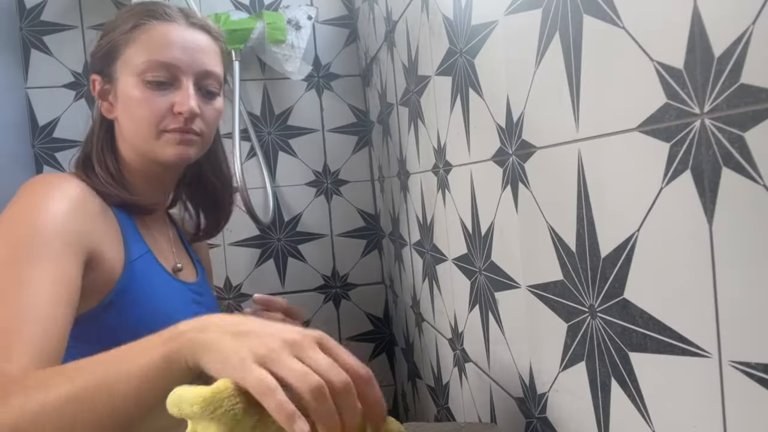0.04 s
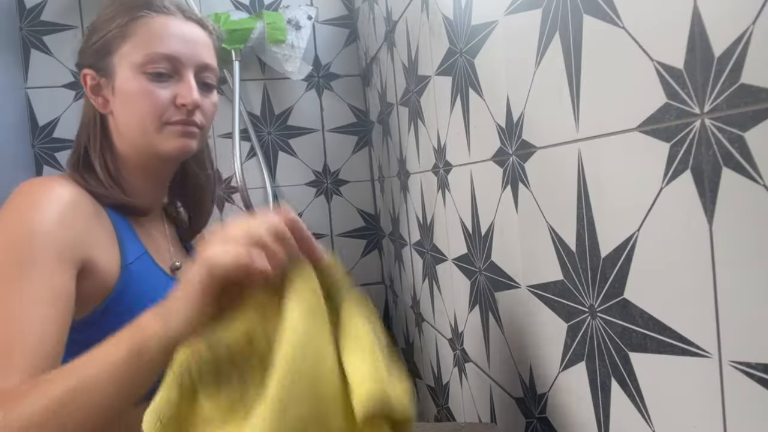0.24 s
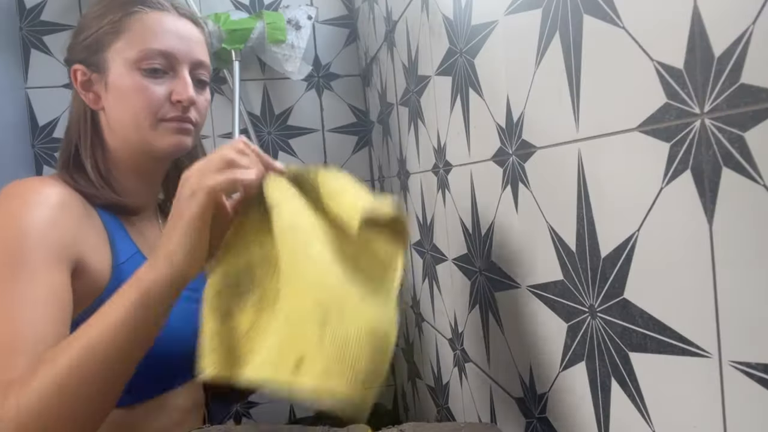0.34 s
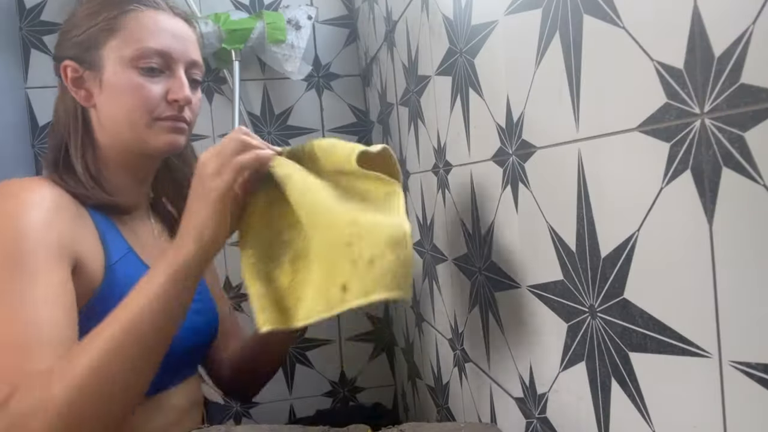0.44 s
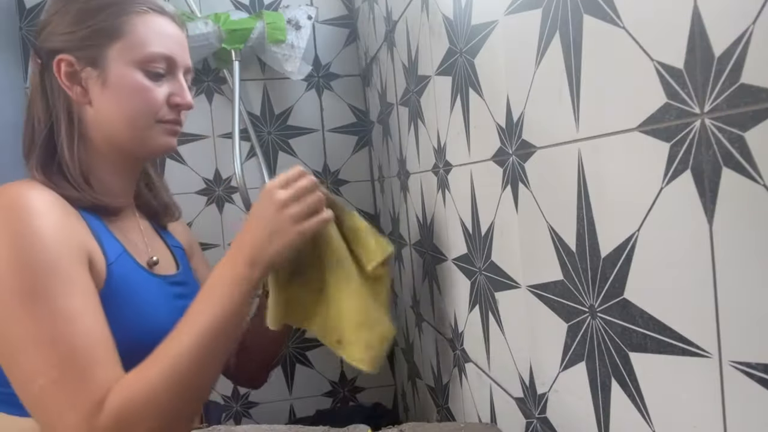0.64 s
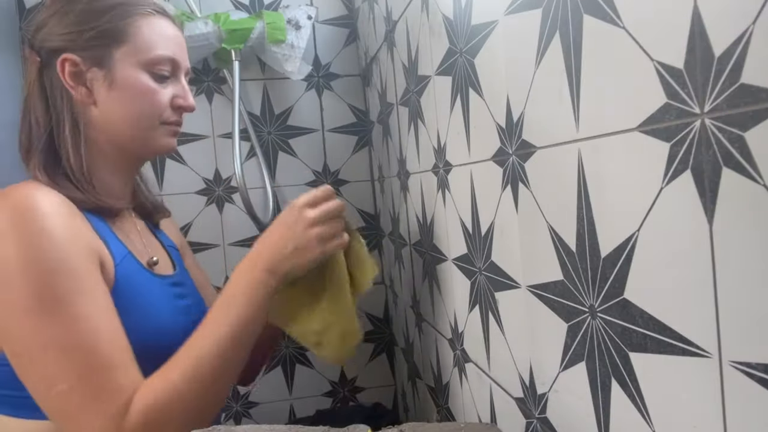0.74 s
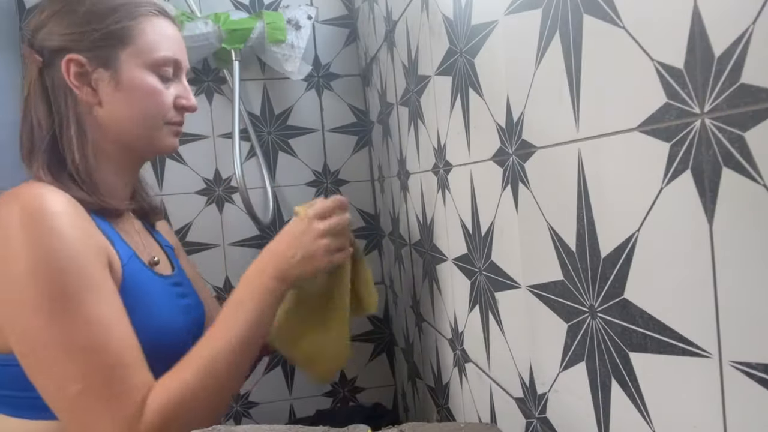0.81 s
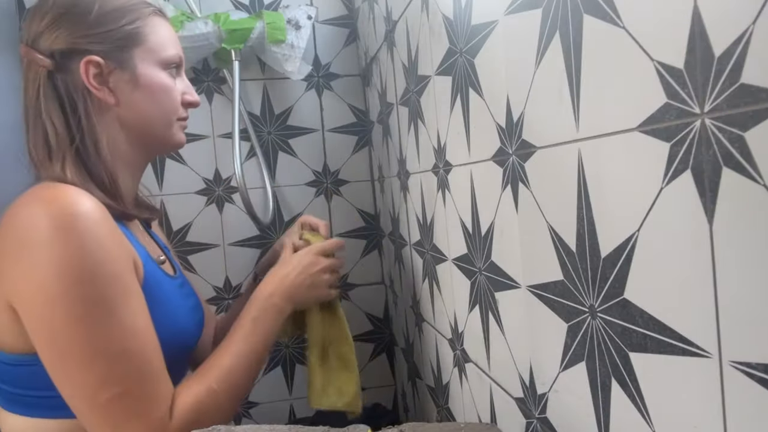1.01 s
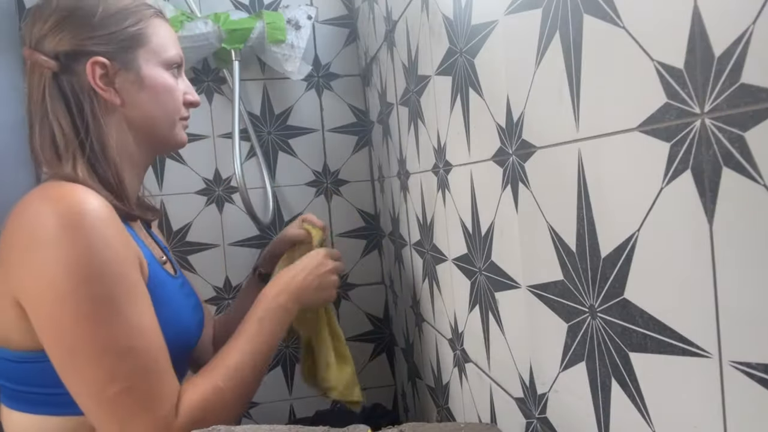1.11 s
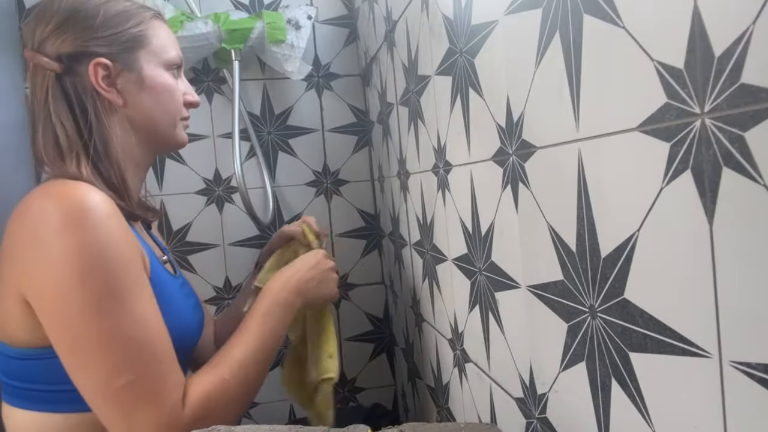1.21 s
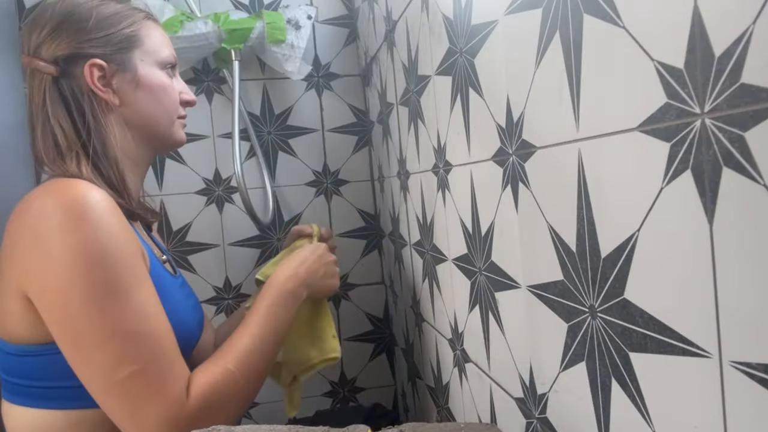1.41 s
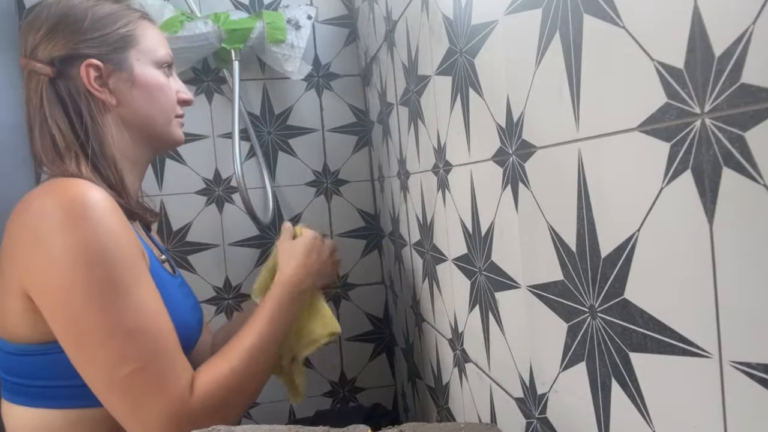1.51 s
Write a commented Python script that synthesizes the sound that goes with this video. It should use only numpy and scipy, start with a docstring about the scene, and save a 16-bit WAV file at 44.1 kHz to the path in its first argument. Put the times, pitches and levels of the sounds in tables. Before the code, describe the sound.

A loud, hollow thump comes as a cloth is snatched off a ledge with a short scrape. Soft rubs and one dull flap follow as it is folded, close up in a small tiled shower with a low rumble.

```python
"""A small tiled shower, close up, where a cloth is snatched off a ledge.
The ledge scrapes, knocks and booms in the stall, overloading the recorder. The cloth is then
turned and folded in the hands: soft grainy rubs, a few ticks of the fibres, wafts of air
and one dull flap. A low room rumble runs underneath."""
import sys
import numpy as np
from scipy import signal
from scipy.fft import rfft, irfft, next_fast_len
from scipy.io import wavfile
from scipy.ndimage import map_coordinates

SR = 44100
rng = np.random.default_rng(int(sys.argv[2]) if len(sys.argv) > 2 else 0)


def master(y):
    """Save y as 16-bit WAV."""
    cut = np.clip(np.atleast_2d(y).T, -1, 1)
    pcm = np.round(cut * 32767)  # scale
    wavfile.write(sys.argv[1], SR, pcm.astype(np.int16))


N = 68355


def amp(db):
    """Decibels to gain."""
    return 10 ** (np.asarray(db) / 20)


def unit(x):
    """Scale to rms 1."""
    return x / np.sqrt(np.mean(x ** 2) + 1e-20)


def along(curve, hz):
    """Read a curve on a log frequency axis."""
    freqs, values = np.transpose(curve)
    return np.interp(np.log(hz + 1), np.log(freqs + 1), values)


def filtered(x, response):
    """EQ x with a gain given as a function of frequency."""
    size = next_fast_len(N + 8192)
    hz = np.fft.rfftfreq(size, 1 / SR)
    return irfft(rfft(x, size) * response(hz), size)[..., :N]


# how alike left and right are: freq_hz, correlation
STEREO_LIKENESS = [(60, .93), (150, .9), (300, .72), (600, .15), (1300, .35), (3000, .15), (8000, .18),
                   (15000, .1)]
def stereo(pair, left_lag_s=0.0004075):
    """Two unrelated signals become left and right, alike in the bass, the left slightly late."""
    def mid_side_gains(hz):
        angle = np.arccos(np.clip(along(STEREO_LIKENESS, hz), -1, 1)) / 2
        return np.array([np.cos(angle), np.sin(angle)])
    mid, side = filtered(pair, mid_side_gains)
    left = filtered(mid + side, lambda hz: np.exp(-2j * np.pi * hz * left_lag_s))
    return np.array([left, mid - side])


def noise(eq):
    """Coloured stereo noise of rms 1."""
    white = stereo(rng.standard_normal((2, N)))
    return unit(filtered(white, lambda hz: amp(along(eq, hz))))


def strokes(cues, eq, grain_db, grains_per_s=900):
    """Noise that swells and fades on each cue, made grainy by catching fibres."""
    t = np.arange(N) / SR
    swells = [amp(db) * np.exp(-np.maximum((peak - t) / rise, (t - peak) / fall))
              for peak, db, rise, fall in cues]
    envelope = np.sqrt(sum(swell ** 2 for swell in swells))
    catches = map_coordinates(rng.standard_normal(N), [t * grains_per_s], order=1)
    return envelope * unit(amp(grain_db * catches)) * noise(eq)


def ring(hits, modes):
    """Each hit sets the modes ringing; the low ones swell as the stall answers."""
    out = np.zeros((2, N))
    sides = np.array([[1], [-1]]) / 2
    for start, hit_db in hits:
        age = np.maximum(np.arange(N) / SR - start, 0)
        for hz, mode_db, t60, rise, pan_db in modes:
            envelope = amp(-60 * age / t60) * (1 - np.exp(-age / rise))
            gain = amp(hit_db + mode_db + sides * pan_db + rng.normal(0, 0.5))
            out += gain * envelope * np.sin(2 * np.pi * hz * age)
    return out


# reverb time of the stall: freq_hz, t60_s
STALL_DECAY = [(100, 0.3), (300, 0.3), (1000, 0.18), (4000, 0.23), (9000, 0.17), (15000, 0.12)]
def stall(x, wet_db=-2.5, build_s=0.0025):
    """Add the echoes that build up and die away between the tiles."""
    hz, t, spectrum = signal.stft(rng.standard_normal((2, SR // 2)), SR, nperseg=256)
    envelope = amp(-60 * t / along(STALL_DECAY, hz)[:, None]) * (1 - np.exp(-t / build_s))
    tail = stereo(signal.istft(spectrum * envelope, SR)[1])
    tail /= np.linalg.norm(tail[0])
    return x + amp(wet_db) * signal.fftconvolve(x, tail, axes=1)[:, :N]


# bass-heavy room bed: freq_hz, gain_db
ROOM_EQ = [(20, -18), (50, 6), (75, -5.5), (105, 2.5), (140, -16.5), (200, -3), (245, -11), (300, -11),
           (400, -17.5), (460, -13.5), (660, -18), (900, -20), (1600, -26.5), (2600, -27.5), (5500, -35.5),
           (9400, -34.5), (12000, -49.5), (15500, -36)]
# narrow stall resonances: pitch_hz, width_hz, level_db
ROOM_HUMS = [(197, 28, -59.5), (290.3, 36, -53.5), (338, 4.6, -56.5), (383.5, 10, -50.5), (663, 46, -59),
             (1390, 17, -66)]
def room_tone():
    """A low rumble with the stall's resonances humming in it."""
    out = amp(-43.5) * noise(ROOM_EQ)
    white = stereo(rng.standard_normal((2, N)))
    for pitch, width, db in ROOM_HUMS:
        hum = filtered(white, lambda hz: 1 / (1 + (2 * (hz - pitch) / width) ** 2))
        out += amp(db) * unit(hum)
    return out


# handling bumps: peak_s, level_db, rise_s, fall_s
BUMP_CUES = [(.085, -39.5, 0.017, 0.015), (.5, -39, .008, 0.032), (.57, -35.5, .03, 0.03),
             (.665, -37.5, 0.0094, 0.011), (.735, -42, 0.018, 0.012), (.86, -42, 0.027, 0.065)]
# boxy low tone: freq_hz, gain_db
BUMP_EQ = [(40, -21), (110, -19), (150, -15), (198, -1), (240, -10.5), (380, -19.5), (600, -26),
           (1200, -44), (4000, -68)]
def handling_bumps():
    """Soft bumps of the hands stir the stall's low resonance."""
    return strokes(BUMP_CUES, BUMP_EQ, grain_db=-3)


# the pull: peak_s, level_db, rise_s, fall_s
SLIDE_CUES = [(.105, -47, 0.034, 0.048), (.16, -46.5, 0.04, 0.12), (.335, -68, .01, .012)]
# bright, broad hiss: freq_hz, gain_db
SLIDE_EQ = [(300, 0), (1500, -1), (2800, 3), (5000, -5), (9000, 0), (11000, -5), (12500, -15),
            (15000, -2.5)]
def cloth_slide():
    """The cloth hisses as it slides off the ledge."""
    return strokes(SLIDE_CUES, SLIDE_EQ, grain_db=2.5)


# scrapes either side of the boom: peak_s, level_db, rise_s, fall_s
SCRAPE_CUES = [(.2055, -21, 0.0061, 0.0059), (.257, -17.5, 0.0013, 0.00098), (.264, -31, 0.0068, 0.015),
               (.269, -21.5, 0.00054, .002)]
# full rasp with a gritty top: freq_hz, gain_db
SCRAPE_EQ = [(200, 12), (1000, 8), (2600, 2), (3500, -1.5), (4500, -7), (6200, -5.5), (8600, 0.5),
             (11000, -6), (12500, -18), (15500, -3)]
def ledge_scrape():
    """The dragged cloth makes the ledge scrape in short, rough bursts."""
    return stall(strokes(SCRAPE_CUES, SCRAPE_EQ, grain_db=3.5))


# three knocks, each harder: start_s, level_db
LEDGE_KNOCKS = [(.206, -22), (.221, -10), (.2375, 0.5)]
# ring of ledge and stall: pitch_hz, level_db, t60_s, rise_s, left_over_right_db
LEDGE_MODES = [(54.9, -36.5, 0.76, .004, 10), (74.7, -27, 0.57, 0.0025, -2),
               (103.85, -17, 0.445, 0.0021, -2.5), (173.5, -5.5, 0.14, 0.012, -7),
               (198.2, 4, 0.21, 0.018, 2.5), (263.5, -11, 0.23, 0.0042, -11.5),
               (310.7, -21.5, 0.17, 0.0042, -13), (373, -6, 0.17, 0.0079, -1.5),
               (395.6, -1.5, 0.15, 0.0033, -8), (480.5, -22, 0.18, 0.0033, -8),
               (558, -12.5, 0.073, 0.0013, -1), (590, -14, 0.14, 0.0021, 2), (700, -10.5, 0.11, 0.0036, 2),
               (872.5, -19.5, 0.093, 0.0021, -21), (1014, -23, 0.1, 0.0019, -16),
               (1061, -19.5, 0.16, 0.0042, 2), (1435, -22.5, 0.11, 0.0019, -7.5),
               (1796, -23.5, 0.06, 0.0013, 1)]
def ledge_boom():
    """Knocks set the ledge and the stall booming."""
    return ring(LEDGE_KNOCKS, LEDGE_MODES)


# tight cluster of transients: peak_s, level_db, rise_s, fall_s
CLACK_CUES = [(.2312, -23, .0008, .001), (.2342, -11, .001, .0013), (.2362, -9, .0007, .0011)]
# hard, bright edge: freq_hz, gain_db
CLACK_EQ = [(200, 4), (1000, -2.5), (2000, 3), (3500, -5), (4300, 4), (6200, 0.5), (8600, 1.5),
            (10500, -5.5), (12500, -16), (15500, -5)]
def ledge_clack():
    """The ledge's sharp clack gives the boom its attack."""
    return stall(strokes(CLACK_CUES, CLACK_EQ, grain_db=1), wet_db=-4.5)


# weight behind the clack: peak_s, level_db, rise_s, fall_s
THUD_CUES = [(.241, -12.5, 0.0054, .013)]
# lows and mids, top rolled off: freq_hz, gain_db
THUD_EQ = [(30, -16), (110, -1.5), (350, -3.5), (700, -3.5), (1050, -7), (1400, -26), (4000, -39),
           (15000, -60)]
def ledge_thud():
    """The dull body of the hardest knock."""
    return stall(strokes(THUD_CUES, THUD_EQ, grain_db=5.5), wet_db=-6)


# swings of the cloth: peak_s, level_db, rise_s, fall_s
WAFT_CUES = [(.35, -25, 0.013, 0.031), (.86, -42, 0.078, 0.051), (.99, -35, .015, 0.031),
             (1.065, -27.5, 0.038, 0.033), (1.48, -47, 0.039, 0.044)]
# sub-bass puff: freq_hz, gain_db
WAFT_EQ = [(20, -14), (50, 3.5), (72, -13), (102, -11.5), (140, -17.5), (300, -28), (1000, -70)]
def air_wafts():
    """The swinging cloth moves the air in deep puffs."""
    return strokes(WAFT_CUES, WAFT_EQ, grain_db=-2)


# folding moves: peak_s, level_db, rise_s, fall_s
RUB_CUES = [(.38, -49, 0.018, 0.013), (.545, -50.5, 0.11, 0.015), (.708, -48, 0.0057, 0.0077),
            (.735, -50, 0.018, 0.0087), (.865, -45.5, 0.03, 0.017), (1.152, -50, 0.013, 0.018),
            (1.234, -45, 0.0069, 0.0069), (1.365, -49.5, 0.02, 0.022), (1.48, -70, .04, .05)]
# warm rustle: freq_hz, gain_db
RUB_EQ = [(150, 8), (600, 3.5), (1300, 3), (2700, -1.5), (4500, -2.5), (7000, -13.5), (10000, -12),
          (12500, -28), (15000, -11)]
def cloth_rubs():
    """Cloth rubs softly on cloth and skin."""
    return strokes(RUB_CUES, RUB_EQ, grain_db=2.5)


# tiny clicks: peak_s, level_db, rise_s, fall_s
TICK_CUES = [(.728, -38, 0.001, 0.00093), (1.217, -43, .0007, 0.0025), (1.366, -51, 0.0022, 0.0035)]
# thin, crisp treble: freq_hz, gain_db
TICK_EQ = [(1000, -27), (5000, -20), (8800, 7), (11500, -5.5), (15000, -4.5)]
def fibre_ticks():
    """Fibres tick as the cloth is turned."""
    return strokes(TICK_CUES, TICK_EQ, grain_db=2.5)


# light slap: peak_s, level_db, rise_s, fall_s
SLAP_CUES = [(1.017, -29.5, 0.0013, 0.0079), (1.03, -41.5, 0.0022, 0.03)]
# its soft midrange: freq_hz, gain_db
SLAP_EQ = [(200, 4.5), (900, 9.5), (1800, 5), (3000, -4), (4500, -14.5), (6000, -25), (15000, -31)]
# thump under the slap: start_s, level_db
THUMP_HITS = [(1.0215, 0.5)]
# its low ring: pitch_hz, level_db, t60_s, rise_s, left_over_right_db
THUMP_MODES = [(52, -25.5, 0.24, .025, -1), (102.3, -17, .2, 0.01, -2.5), (252.5, -22, 0.13, 0.0036, -11.5),
               (283.5, -21, 0.11, 0.0025, -11), (392.4, -27.5, 0.15, 0.0027, -5)]
# pushes of air: peak_s, level_db, rise_s, fall_s
PUSH_CUES = [(1.027, -24, 0.0063, 0.019), (1.05, -24, 0.0061, 0.0051)]
# their hollow low mids: freq_hz, gain_db
PUSH_EQ = [(25, -28), (100, -14), (160, -6.5), (270, 6), (400, 1.5), (550, -28), (1000, -8), (3000, -54)]
def cloth_flap():
    """The cloth falls against itself with a dull slap, a low thump and two pushes of air."""
    slap = stall(strokes(SLAP_CUES, SLAP_EQ, grain_db=-3))
    thump = ring(THUMP_HITS, THUMP_MODES)
    air = strokes(PUSH_CUES, PUSH_EQ, grain_db=-1.5)
    return slap + thump + air


def scene():
    """Ledge, cloth and moving air over the rumble of the room."""
    ledge = ledge_scrape() + ledge_clack() + ledge_thud() + ledge_boom()
    cloth = cloth_flap() + stall(cloth_slide() + cloth_rubs() + fibre_ticks())
    return ledge + cloth + handling_bumps() + air_wafts() + room_tone()


def record(dry):
    """The recorder clips the boom at full scale and keeps nothing above its band limit."""
    knee_hardness, top_hz = 10, 15900
    clipped = dry / (1 + np.abs(dry) ** knee_hardness) ** (1 / knee_hardness)
    return filtered(clipped, lambda hz: hz < top_hz)


dry = scene()
out = record(dry)
master(out)
```